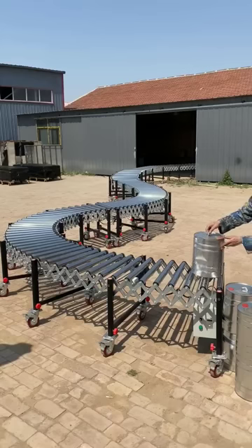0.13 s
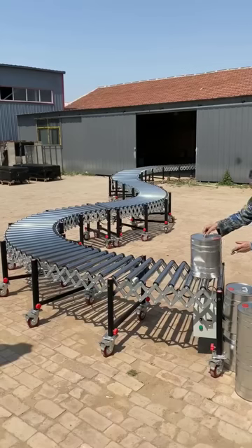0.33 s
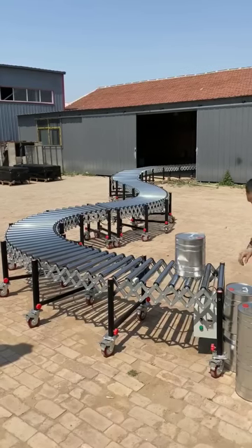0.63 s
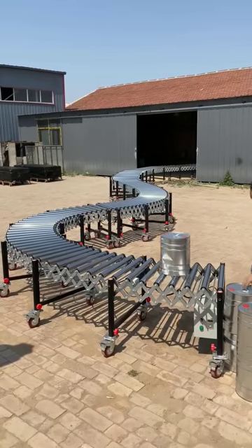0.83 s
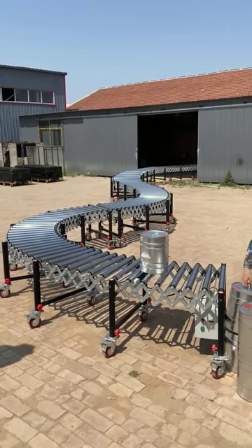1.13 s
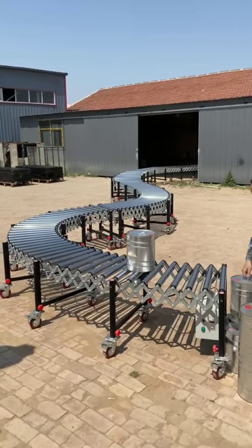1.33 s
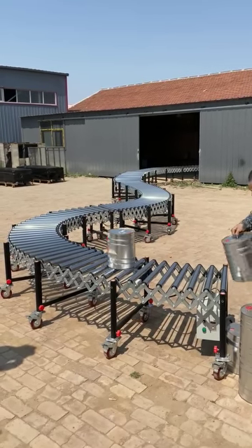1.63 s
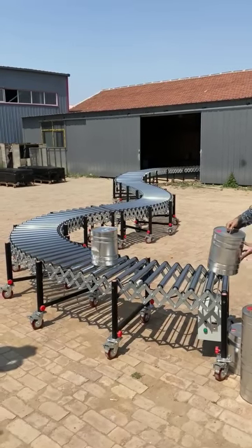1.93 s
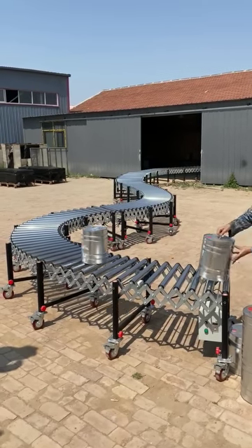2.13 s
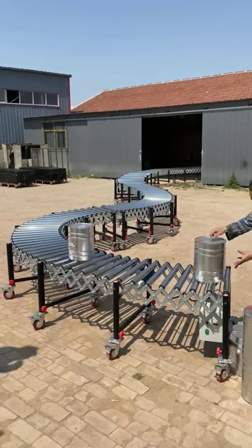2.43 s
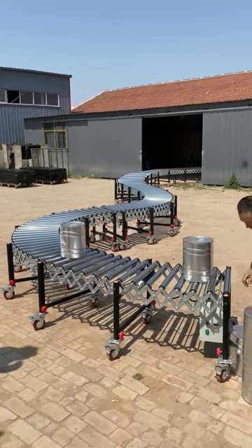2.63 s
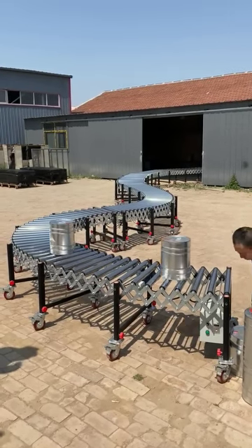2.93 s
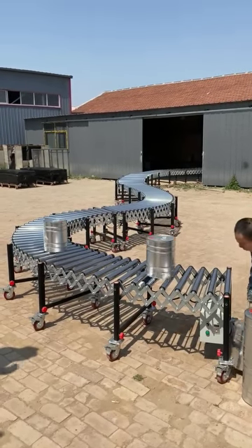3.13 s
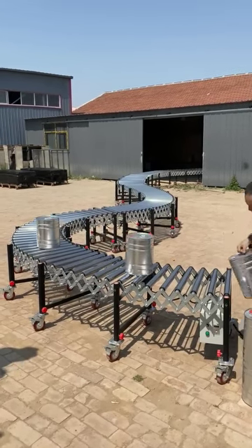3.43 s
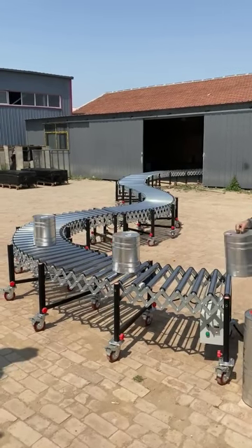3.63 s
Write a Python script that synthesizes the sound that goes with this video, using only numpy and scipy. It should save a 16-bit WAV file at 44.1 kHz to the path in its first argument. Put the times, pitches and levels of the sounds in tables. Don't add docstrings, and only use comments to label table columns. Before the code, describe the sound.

After a brief silence, at 0.13 s an empty metal drum touches a roller conveyor, with hard clattering knocks at 0.3-0.4 s. It rides away with irregular rattles, hollow booms and deep thumps near 0.95 s, thinning around 1.4-1.75 s. A second drum knocks on from 1.9 s, strongest near 2.4 s. Bearings rumble throughout; from about 2.3 s wind buffets the microphone, with heavy low thumps around 3 and 3.5 s.

```python
import sys
import numpy as np
from scipy import signal
from scipy.fft import rfft, irfft, next_fast_len
from scipy.io import wavfile

SR = 44100
rng = np.random.default_rng(int(sys.argv[2]) if len(sys.argv) > 2 else 0)


def makeup_ratio(level_db):
    decades = np.asarray(level_db, float) / 20
    return 10 ** decades


def int16_out(signal):
    q = np.round(np.clip(np.atleast_2d(signal).T, -1, 1) * 32767)
    wavfile.write(sys.argv[1], SR, q.astype(np.int16))


N = 166257
TIME_S = np.arange(N) / SR


def rms_one(x):
    return x / np.sqrt(np.mean(x ** 2) + 1e-20)


def in_time(rows):
    return np.interp(TIME_S, *np.transpose(rows))


def at_hz(points, hz):
    pitch, value = np.array(points).T
    return np.interp(np.log(hz + 1), np.log(pitch + 1), value)


def drift(rate_hz):
    r = np.exp(-80 * np.pi * rate_hz / SR)
    slow = signal.lfilter([1], [1, -2 * r, r * r], rng.standard_normal(N // 40 + 2002))
    slow = slow[2000:]
    return np.interp(np.arange(N) / 40, np.arange(len(slow)), rms_one(slow - slow.mean()))


def ring(clicks, hz, t60_s):
    r = makeup_ratio(-60 / (t60_s * SR))
    w = 2 * np.pi * hz / SR
    return signal.lfilter([0, np.sin(w)], [1, -2 * r * np.cos(w), r * r], clicks + 1e-18)


def train(start_s, sizes):
    out = np.zeros(N)
    np.add.at(out, np.clip((start_s * SR).astype(int), 0, N - 1), sizes)
    return out


def grains(per_s, spread_db):
    sizes = makeup_ratio(spread_db * np.minimum(rng.exponential(1, N), 5)) * rng.choice([-1, 1], N)
    return rms_one(sizes * (rng.random(N) < per_s / SR))


def banded(spectrum, patchy_db, rate_hz, channels, count):
    out = 0
    together = drift(rate_hz)
    edges = 25 * 2 ** (np.arange(count + 1) / 2)
    white = rng.standard_normal((2, channels, N))
    for k, (low, high) in enumerate(zip(edges, edges[1:])):
        sos = signal.butter(2, [low, high], "band", fs=SR, output="sos")
        band = signal.sosfilt(sos, white[k % 2])
        flicker_db = patchy_db * (0.41 * together + drift(rate_hz))
        out = out + band * makeup_ratio(at_hz(spectrum, np.sqrt(low * high)) + flicker_db)
    return rms_one(out)


# start_s, level_db
GUST_STRENGTH = [(.14, -36.5), (.6, -40), (1.0, -48), (1.45, -49), (1.9, -38), (2.3, -26), (2.55, -30.5),
                 (2.75, -36.5), (3.0, -29), (3.2, -34.5), (3.3, -34), (3.45, -30), (3.62, -37), (3.77, -30)]
# pitch_hz, level_db (per Hz)
WIND_COLOUR = [(25, -27), (55, -3), (150, -4), (300, -10), (600, -18.5)]


def wind():
    alike, arrives_s, rise_s = 0.085, 2.36, 0.29
    mid, side = banded(WIND_COLOUR, 5.5, 15.0, channels=2, count=9)
    own = np.clip((TIME_S - arrives_s) / rise_s, .03, 1) * np.sqrt(1 - alike)
    return makeup_ratio(in_time(GUST_STRENGTH)) * (mid + own * side * [[1], [-1]])


# pitch_hz, level_db (per Hz)
RUMBLE_COLOUR = [(40, -10), (120, -7), (350, 1.5), (800, -2.5), (1500, -8.5), (2500, -22.5), (6000, -41.5),
                 (12000, -64)]


def rollers(ride_db):
    level_db = -32 + .8 * (ride_db - ride_db.mean())
    return banded(RUMBLE_COLOUR, 2.47, 18.8, channels=2, count=18) * makeup_ratio(level_db)


def yard(x):
    t60_s = 0.18
    t = np.arange(SR // 5) / SR
    tail = rng.standard_normal(len(t)) * makeup_ratio(-60 * t / t60_s)
    return signal.fftconvolve(x, tail / np.sqrt(np.sum(tail ** 2)))[:N]


# pitch_hz, lead_radians
LEFT_LEAD = [(1, 0), (400, -.3), (600, -3.2), (800, -4.9), (1100, -6.3), (1900, -6.2), (2200, -3.9),
             (2800, -4.4), (3100, -3.0), (5100, -3.14), (5400, -6.3), (6500, -5.9), (11500, -3.2),
             (13500, -3.1)]
# pitch_hz, level_db
PORT_DIFFERENCE = [(100, -9), (300, -6), (500, -2), (1250, -3), (1650, -11), (2000, -3), (2400, -5),
                   (2800, 0), (3250, -5), (3700, -1), (4100, -4), (4350, -11), (4900, -12), (5200, 0),
                   (6100, -7), (8400, -2), (10500, -3), (12000, -7)]


def ports(direct, scattered):
    size = next_fast_len(N + 4096)
    hz = np.fft.rfftfreq(size, 1 / SR)
    turn = np.exp(.5j * at_hz(LEFT_LEAD, hz))
    same = rfft(direct, size)
    apart = rfft(scattered, size) * makeup_ratio(at_hz(PORT_DIFFERENCE, hz))
    return irfft(np.array([(same + apart) * turn, (same - apart) / turn]), size)[:, :N]


# start_s, peak_db, pitch_hz, left_right_difference (share)
HEAVY_THUMPS = [(0.307, -29, 145, 0.014), (0.713, -25.5, 140, 0.0018), (0.899, -19, 150, 0),
                (0.956, -14.5, 199, -0.084), (0.97, -18, 112, -0.055), (2.249, -22, 120, 0.1),
                (2.521, -20.5, 55.6, 0.032), (2.777, -15, 150.4, 0.013), (2.849, -21, 49.8, 0.021),
                (3.011, -11.5, 65, 0.32), (3.269, -19.5, 58, -0.17), (3.452, -15, 54.6, 0.36),
                (3.503, -14, 97, -0.15), (3.671, -23.5, 112, 0.32)]


def thumps():
    rise_s, t60_s, gain_db = .012, .13, 9
    out = np.zeros((2, N))
    for start_s, db, hz, apart in HEAVY_THUMPS:
        t = np.maximum(TIME_S - start_s, 0)
        swell = makeup_ratio(db + gain_db - 60 * t / t60_s) * (1 - np.exp(-t / rise_s))
        out += swell * np.sin(2 * np.pi * hz * t) * [[1 + apart], [1 - apart]]
    return out


# start_s, peak_db, pitch_hz, t60_s
ROCKING_BOOMS = [(.32, -32.5, 321.7, 1.2), (.35, -39, 400, 0.61), (.41, -33, 235, 0.42),
                 (0.628, -26.5, 295, 0.76), (.72, -24, 340, 0.41), (.72, -24, 235, 0.61),
                 (1.02, -37, 113, 2.2), (1.06, -25.5, 410, 0.62), (1.13, -23, 300, 0.21),
                 (1.42, -25.5, 365, 0.52), (1.559, -33, 275, 0.66), (2.46, -29, 375, .5),
                 (2.61, -27, 315, 0.42), (2.63, -19, 375, 0.21), (2.672, -21.5, 440, 0.28),
                 (2.78, -26.5, 380, 0.66), (3.003, -13, 440, 0.12), (3.122, -24.5, 280, 0.14),
                 (3.14, -24, 375, 0.36), (3.33, -24.5, 180, 0.17), (1.75, -34, 745, 0.34),
                 (1.821, -32, 276, .4), (2.2, -27, 552, 0.39), (2.27, -22.5, 224.4, .3),
                 (1.32, -31, 690, .4), (3.49, -24, 375, 0.38), (3.655, -21.5, 380, 0.25)]


def booms():
    rise_s, gain_db = .02, 4
    out = 0
    bent_time = np.cumsum(1 + .03 * drift(14.2)) / SR
    lumps = makeup_ratio(3 * drift(20))
    for start_s, db, hz, t60_s in ROCKING_BOOMS:
        t = np.maximum(TIME_S - start_s, 0)
        swell = makeup_ratio(db + gain_db - 60 * t / t60_s) * (1 - np.exp(-t / rise_s))
        out = out + swell * np.sin(2 * np.pi * hz * bent_time)
    return out * lumps


# pitch_hz, level_db (per Hz)
SHEET_COLOUR = [(700, -13.5), (1500, -9.5), (2400, -13.5), (3000, -22), (5000, -16), (6100, -27),
                (6900, -23.5), (12500, -38.5)]
# start_s, peak_db, hollow_body_db, after_rattle_db
RIM_KNOCKS = [(0.1307, -36.5, -48, -39.5), (0.298, -20.5, -50, -28), (0.378, -20, -30, -28.5),
              (0.42, -29, -47, -35), (0.4698, -50, -40, -58), (0.5306, -42, -54, -64),
              (0.609, -35, -31, -41), (0.6585, -45, -37, -68), (0.7084, -31, -52, -42),
              (0.7335, -37, -43, -37.5), (0.7674, -30, -43, -68), (0.7994, -62, -29, -55),
              (0.886, -31, -35, -34), (0.9456, -33.5, -33.5, -49), (0.974, -51, -49, -59),
              (1.0194, -46, -45, -65), (1.062, -29, -37, -33.5), (1.1205, -32.5, -36, -68),
              (1.2336, -30, -46, -32.5), (1.3167, -29, -48, -33), (1.3574, -36, -47, -61),
              (1.4687, -65, -39, -73), (1.7709, -41.5, -31.5, -51), (1.942, -42, -35, -41),
              (1.9887, -35.5, -33, -48.5), (2.1118, -33.5, -42, -39.5), (2.1685, -29.5, -46, -35),
              (2.2402, -26.5, -44, -34), (2.2744, -27, -34, -33), (2.3488, -32.5, -41, -41.5),
              (2.4324, -22.5, -45, -34.5), (2.4721, -34, -44, -42), (2.5164, -36, -42, -38),
              (2.551, -48, -35, -61), (2.6319, -40, -33, -45.5), (2.6764, -33, -27, -37),
              (2.7351, -35, -35, -41), (2.7818, -26.5, -55, -35), (2.8285, -45, -26.5, -66),
              (2.9194, -28, -56, -36), (2.9712, -42, -30, -31.5), (3.02, -43, -48, -59),
              (3.0677, -33.5, -46, -43), (3.1038, -33.5, -27, -33.5), (3.2715, -29.5, -50, -33),
              (3.3293, -30, -31, -33), (3.4088, -41, -52, -34.5), (3.5001, -32, -24, -36),
              (3.6611, -28, -49, -33.5), (3.7384, -30.5, -29, -42)]


def sheet_spots(spots):
    hz = 550 + 12500 * rng.random(900) ** 1.5
    t = np.arange(SR // 6) / SR
    t60_s = 0.17 * (hz / 3000) ** -0.1 * rng.uniform(0.3, 1.106, len(hz))
    modes = np.sin(2 * np.pi * hz[:, None] * t) * makeup_ratio(-60 * t / t60_s[:, None])
    uneven_db = 4 * rng.standard_normal((spots, 1, len(hz)))
    level_db = at_hz(SHEET_COLOUR, hz) + uneven_db + 2.65 * np.log10(hz / 3000)
    return (rng.standard_normal((spots, 2, len(hz))) * makeup_ratio(level_db)) @ modes


def clatter(ride_db):
    start_s, db, _, after_db = np.transpose(RIM_KNOCKS)
    bounce_s, after_t60_s = .011, 0.34
    late_s = rng.exponential(1, (len(start_s), 5)) * bounce_s * [0.02, 0.14, 0.38, 1, 1.4]
    sizes = makeup_ratio(db[:, None] + 3 - [0, 4, 6, 8, 11] + rng.normal(0, 0.33, late_s.shape))
    after_clicks = train(start_s, makeup_ratio(2 * (after_db + 5.5)))
    after = signal.lfilter([1], [1, -makeup_ratio(-120 / (after_t60_s * SR))], after_clicks)
    idle_db = ride_db.mean() + 0.87 * (ride_db - ride_db.mean()) - 7
    shiver = np.sqrt(after + makeup_ratio(2 * idle_db)) * makeup_ratio(-32 + 2.17 * drift(9.5))
    spot = np.arange(late_s.size).reshape(late_s.shape) % 6
    out = 0
    for k, response in enumerate(sheet_spots(6)):
        chatter = grains(80, 2.94) * shiver * makeup_ratio(4 * drift(8.7))
        hits = train((start_s[:, None] + late_s)[spot == k], sizes[spot == k]) + chatter
        out = out + signal.fftconvolve(hits[None], response, axes=1)[:, :N]
    return makeup_ratio(-14.5) * out


def drum(modes, ride_db, share):
    soft_hz = 487
    start_s, _, body_db, _ = np.transpose(RIM_KNOCKS)
    rattle = grains(500, 1.9)
    shaken, struck = 0, 0
    for hz, level_db, t60_s in modes:
        if hz > 600:
            t60_s = min(t60_s, .11)
        shake_db = 0.91 * (ride_db + 38.5) - 38.0 + level_db + 4 * drift(3.8)
        shaken = shaken + ring(rattle * share * makeup_ratio(shake_db), hz, t60_s)
        blow_db = body_db + level_db - 9.5 + rng.normal(0, 4.0, len(start_s))
        blows = train(start_s, makeup_ratio(blow_db))
        struck = struck + ring(blows * share, hz, t60_s) / np.hypot(1, hz / soft_hz)
    return makeup_ratio(-39) * shaken + struck


# pitch_hz, level_db, t60_s
FIRST_DRUM = [(114.9, -1.5, 0.72), (180, 0.5, 0.17), (236, -0.5, 0.43), (281.7, 7, 0.27),
              (329.7, 7.5, 0.32), (376, 4, 0.27), (437.4, 4, 0.27), (745, 6, 0.18), (799, 5, 0.1),
              (885, 8.5, 0.12), (1060, 7.5, 0.087), (1450, 10.5, 0.06), (1502, 6, 0.092), (1554, 2.5, 0.11)]
# pitch_hz, level_db, t60_s
SECOND_DRUM = [(112, 5, 0.58), (145, 10, 0.19), (226, -10, 0.13), (277, -1, 0.14), (323.7, 7.5, 0.12),
               (362, 3.5, 0.19), (380, 6.5, 0.093), (453.4, 2, 0.096), (747, 6.5, 0.11), (812, -7, 0.24),
               (882.4, 9, 0.11), (1367, -7.5, 0.043), (1476, 10, 0.077), (1544, -1, 0.21)]


def drums(ride_db):
    second_s, handover_s = 1.72, 0.33
    second = np.clip((TIME_S - second_s) / handover_s + .5, .1, .9)
    return drum(FIRST_DRUM, ride_db, 1 - second) + drum(SECOND_DRUM, ride_db, second)


# start_s, level_db
RIDE_SHAKING = [(0.14, -33.5), (0.28, -46), (0.31, -25), (0.45, -25), (0.6, -35), (0.8, -27), (0.87, -37.5),
                (0.9, -30), (1.41, -35), (1.7, -46), (1.79, -35.5), (1.83, -42.5), (2.31, -34), (2.42, -37),
                (2.43, -27.5), (3.25, -35), (3.27, -35.5), (3.77, -31.5)]


def scene():
    ride_db = in_time(RIDE_SHAKING)
    hollow = drums(ride_db) + booms()
    direct, sideways = clatter(ride_db) + rollers(ride_db)
    return ports(hollow + direct, yard(hollow) + sideways) + thumps() + wind()


def thin(x):
    mask_db, hush_db, sparse_db, dither_db = -12, -49, -6, 3
    pair = np.array([x[0] + x[1], x[0] - x[1]]) / 2
    pair = np.pad(pair, ((0, 0), (0, 2048)), "reflect")
    hz, _, z = signal.stft(pair, SR, nperseg=2048, noverlap=1024)
    power = np.abs(z[:, :1024]) ** 2
    band = power.reshape(2, 32, 32, -1).mean(axis=2)
    both = np.repeat(band.sum(axis=0), 32, axis=-2)
    loud = band[:, 2:].mean(axis=(0, 1)) ** .75
    uneven = makeup_ratio(2 * dither_db * rng.standard_normal(band.shape))
    band = np.repeat(band * uneven, 32, axis=-2)
    unmasked = band > makeup_ratio(2 * mask_db) * both
    audible = band > makeup_ratio(2 * hush_db + 20) * loud
    strong = power > makeup_ratio(2 * sparse_db) * both / 2
    low = (hz[:1024] < 1500)[:, None]
    z[:, :1024] *= (unmasked & audible & strong) | low
    mid, side = signal.istft(z, SR, nperseg=2048, noverlap=1024)[1][:, :N]
    return np.array([mid + side, mid - side])


def band_limit(x):
    return signal.sosfilt(signal.butter(12, 13480, fs=SR, output="sos"), x)


def record(dry):
    start_s, fade_s = .1308, 0.0012
    on = np.clip((TIME_S - start_s) / fade_s, 0, 1)
    mix = thin(0.31 * np.tanh(dry / 0.46)) * on
    return band_limit(mix)


dry = scene()
out = record(dry)
int16_out(out)
```